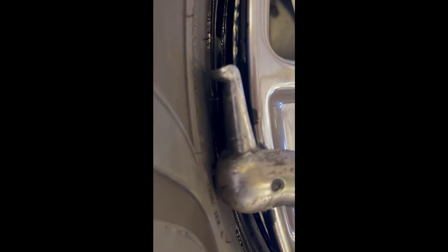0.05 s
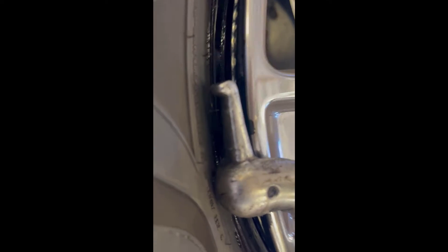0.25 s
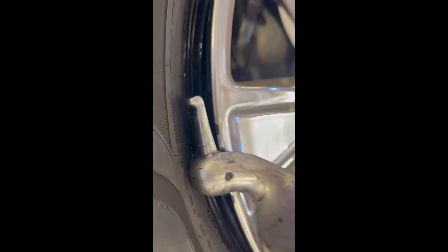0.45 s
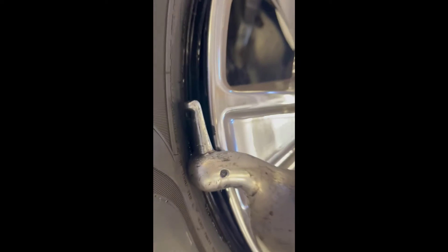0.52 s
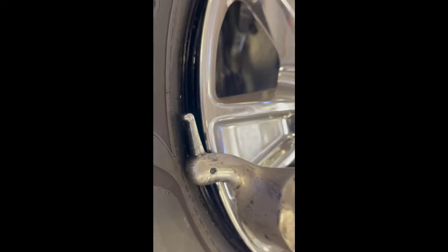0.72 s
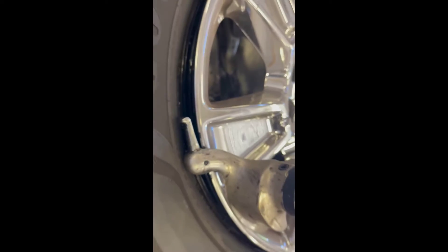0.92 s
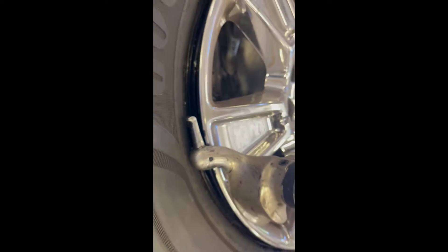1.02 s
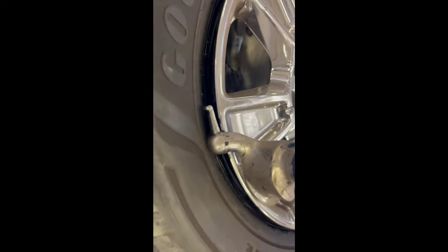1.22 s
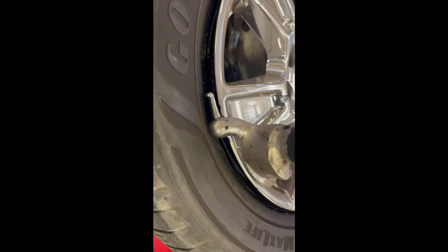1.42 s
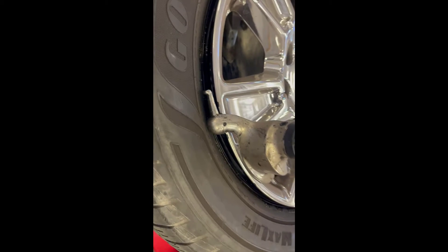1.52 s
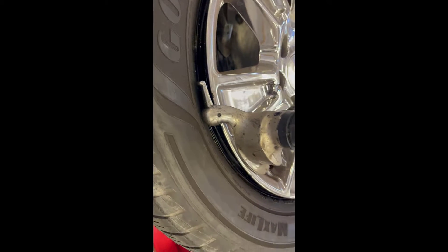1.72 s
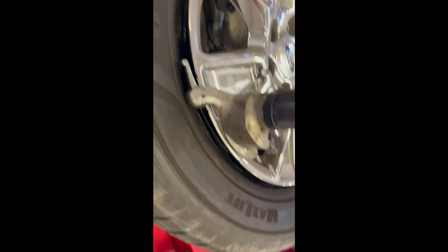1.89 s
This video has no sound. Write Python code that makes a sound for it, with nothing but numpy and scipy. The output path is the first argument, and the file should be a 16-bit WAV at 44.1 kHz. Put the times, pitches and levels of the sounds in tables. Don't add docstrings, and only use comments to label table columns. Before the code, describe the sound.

A steel mounting head clanks on a wheel rim. A faint earlier knock dies away at the start; a light metallic knock comes at 0.22 s, the loud, quickly damped clank at 0.35 s, a weak bright rebound near 0.48 s. Hard walls echo briefly. Faint ticks and a soft tyre thud follow around 1.0-1.45 s, over steady low rumble, motor hum and faint hiss until 2 s.

```python
import sys
import numpy as np
from scipy import signal
from scipy.fft import rfft, irfft, next_fast_len
from scipy.io import wavfile
from scipy.ndimage import uniform_filter1d, minimum_filter1d, map_coordinates

SR = 44100
rng = np.random.default_rng(int(sys.argv[2]) if len(sys.argv) > 2 else 0)


def makeup_ratio(level_db):
    decades = np.asarray(level_db, float) / 20
    return 10 ** decades


def to_wav(sig):
    pcm = np.clip(np.atleast_2d(sig), -1, 1) * 32767
    pcm = np.round(pcm).astype(np.int16)
    wavfile.write(sys.argv[1], SR, pcm.T)


N = 85995


def unit(x):
    return x / np.sqrt(np.mean(x ** 2) + 1e-20)


def along(points, hz):
    f, v = np.transpose(points)
    return np.interp(np.log(hz + 1), np.log(f + 1), v)


def wobble(rate):
    knots = rng.standard_normal(int(N * rate / SR) + 4)
    return map_coordinates(knots, [np.arange(N) * rate / SR])


def filtered(x, response):
    m = next_fast_len(x.shape[-1] + 8192)
    spectrum = rfft(x, m) * response(np.fft.rfftfreq(m, 1 / SR))
    return irfft(spectrum, m)[..., :x.shape[-1]]


def shaped_noise(curve, length):
    return filtered(rng.standard_normal((2, length)), lambda hz: makeup_ratio(along(curve, hz)))


def add(mix, x, s):
    k = round(s * SR)
    x = x[:, max(-k, 0):][:, :N - max(k, 0)]
    mix[:, max(k, 0):][:, :x.shape[1]] += x


# frequency in Hz, likeness from 0 to 1.
LIKENESS = [(100, .999), (300, .96), (550, .35), (2500, .4), (5000, .5), (6000, .96), (7200, .75),
            (9000, .995), (11000, .9), (12000, .995), (13400, .995), (15000, .9)]


def stereo(pair):
    def middle_and_side(hz):
        turn = np.arccos(np.clip(along(LIKENESS, hz), 0, 1)) / 2
        return np.array([np.cos(turn), np.sin(turn)])

    mid, side = filtered(pair, middle_and_side)
    return np.array([mid + side, mid - side])


# frequency in Hz, time to fall 60 dB in seconds.
NEAR_WALLS = [(100, 0.36), (350, 0.76), (1000, 0.4), (3000, 0.75), (6000, 0.59), (11000, 0.42)]
# frequency in Hz, level in dB, time to fall 60 dB in seconds.
FAR_END_OF_HALL = [(198.5, -18, 1.81), (990, -14, 0.92), (2440, -19.5, 3.44), (5200, -15.5, 2.3),
                   (10000, -13.5, 1.66)]


def workshop(pair, wet_db):
    gap_s, width = 0.005, 0.91
    hz, t, z = signal.stft(rng.standard_normal((2, N)), SR, nperseg=256)
    near = makeup_ratio(-60 * t / along(NEAR_WALLS, hz)[:, None])
    far_hz, far_db, far_t60 = np.transpose(FAR_END_OF_HALL)
    far_start_db = np.interp(hz, far_hz, far_db)[:, None]
    far = makeup_ratio(far_start_db - 60 * t / np.interp(hz, far_hz, far_t60)[:, None])
    tail = stereo(signal.istft(z * (near + far), SR, nperseg=256)[1])
    tail = np.pad(tail / np.linalg.norm(tail[0]), ((0, 0), (round(gap_s * SR), 0)))
    direct = stereo(pair * [[1], [width]])
    direct = np.pad(direct, ((0, 0), (0, tail.shape[1] - 1)))
    return makeup_ratio(wet_db) * signal.fftconvolve(pair[:1], tail, axes=1) + direct


# frequency in Hz, level in dB.
RUMBLE_COLOUR = [(12, -69), (20, -35.5), (59, 5), (76, -7), (91, -10.5), (120, -9.5), (184, -16.5),
                 (231, -14), (300, -33.5), (390, -54), (660, -120)]
# time in seconds, strength in dB.
RUMBLE_SWELL = [(0.0, -38), (0.026, -42.5), (0.254, -51), (0.422, -36), (0.76, -46.5), (1.036, -37),
                (1.134, -48.5), (1.25, -38), (1.33, -59.5), (1.374, -35.5), (1.695, -47.5), (1.732, -31.5),
                (1.77, -49), (1.95, -35.5)]


def rumble():
    low = unit(stereo(shaped_noise(RUMBLE_COLOUR, N)))
    deep = filtered(low, lambda hz: 1 / (1 + (hz / 88) ** 6))
    s, db = np.transpose(RUMBLE_SWELL)
    swell_db = np.interp(np.arange(N) / SR, s, db - db.mean())
    return makeup_ratio(-40.5) * (low - deep + makeup_ratio(0.85 * swell_db) * deep)


# frequency in Hz, level in dB.
HISS_COLOUR = [(200, -55), (280, -11.5), (500, -14), (1000, -26.5), (1700, -20.5), (2700, -35),
               (6000, -41.5), (11500, -37)]


def hiss():
    level = makeup_ratio(-55.5 + 0.7 * wobble(3))
    return level * unit(stereo(shaped_noise(HISS_COLOUR, N)))


# frequency in Hz, peak level in dB.
HUM_TONES = [(114, -77), (240, -66.5), (291, -58.5), (360.4, -55), (481, -69.5)]


def hum():
    t, total = np.arange(N) / SR, np.zeros(N)
    for hz, db in HUM_TONES:
        level = makeup_ratio(db + 1.9 * wobble(4.99))
        turns = hz * t + rng.random() + 0.15 * wobble(17)
        total += level * np.sin(2 * np.pi * turns)
    return total


TICK_STARTS = [.072, .141, .394, .449, .487, .558, .977, 1.026, 1.026, 1.103, 1.168, 1.174, 1.186, 1.225,
               1.227, 1.311, 1.321, 1.324, 1.436]
# level in dB, centre in Hz, width in Hz, time to fall 60 dB in seconds.
TICK_PUFFS = [(-34.5, 224, 180, 0.26), (-42.5, 2500, 2000, 0.032), (-13, 356, 72, 0.15),
              (-21, 290, 170, 0.035), (-27, 1910, 320, 0.1), (-40, 3800, 1600, 0.2),
              (-47, 8200, 4150, 0.016), (-47.5, 7500, 1200, 0.056), (-46, 10000, 2600, 0.053),
              (-61.5, 9400, 5300, 0.3), (-53, 1100, 2300, 0.31), (-54, 3800, 1200, 0.2),
              (-54.5, 4400, 17000, 0.33), (-40, 1270, 780, 0.022), (-48, 880, 60, 0.052),
              (-53, 3100, 3000, 0.012), (-53.5, 8100, 3300, 0.043), (-41.5, 4700, 1200, 0.022),
              (-42, 3600, 5100, 0.0088)]


def ticks():
    mix, t = np.zeros((2, N)), np.arange(SR // 5) / SR
    rise = 1 - np.exp(-t / 0.0026)
    for s, (db, centre, width, t60) in zip(TICK_STARTS, TICK_PUFFS):
        def resonance(hz):
            through = 1j * hz * width
            return (through / (centre * centre - hz * hz + through)) ** 2

        puff = unit(filtered(rng.standard_normal((2, len(t))), resonance))
        add(mix, puff * makeup_ratio(db - 60 * t / t60) * rise, s)
    return mix


# frequency in Hz, level in dB, time to fall 60 dB in seconds.
TYRE_TONES = [(146, -6, 0.12), (218, 3.5, 0.084), (255, -1.5, 0.063)]


def tyre_thud():
    mix, t = np.zeros((2, N)), np.arange(SR // 5) / SR
    thud = sum(makeup_ratio(db - 33.5 - 60 * t / t60) * np.sin(2 * np.pi * hz * t) for hz, db, t60 in TYRE_TONES)
    thud = thud * (1 - np.exp(-t / 0.0028))
    add(mix, np.array([thud, thud]), 1.229)
    return mix


def build_up(t, rise_s):
    return 1 - np.exp(-(t / rise_s) ** 2)


def steel_ring(t, tones, rise_s, low_later):
    ring = np.zeros((2, len(t)))
    for hz, db, t60 in tones:
        start = rng.random((2, 1)) * [[0], [1]] - hz * rise_s
        turns = hz * t + start + 0.13 * wobble(30.3)[:len(t)]
        decay = makeup_ratio(db - 60 * t / min(t60, 146 / hz))
        ring += build_up(t, rise_s * (1000 / hz) ** low_later) * decay * np.sin(2 * np.pi * turns)
    return ring


def blow(row, tones, crack):
    s, level_db, rise_s, crack_db, low_later = row
    t = np.arange(SR // 2) / SR
    choke = makeup_ratio(-9.5 / (1 + np.exp((0.076 - t) / 0.0031)))
    ring = steel_ring(t, tones, rise_s, low_later) * choke
    burst = unit(shaped_noise(crack, len(t))) * makeup_ratio(crack_db - 60 * t / 0.13)
    burst = burst * build_up(t, rise_s / 1.67)
    return workshop(makeup_ratio(level_db) * (ring + burst), -3.5), s


# start in seconds, level in dB, build-up in seconds, crack level in dB,
# how much later low tones build up (a power, no unit).
STEEL_BLOWS = [
    (0.2241, -20, 0.01, 0.5, 0.44),
    (0.349, -11, 0.0105, 0.5, 0.014),
    (.470, -24.5, 0.025, 1, 0.022),
]
# frequency in Hz, level in dB, time to fall 60 dB in seconds.
HEAD_TONES = [(228, -16.5, 0.31), (352.5, -0.5, 0.15), (567.3, -10.5, 0.36), (933, 4, 0.079),
              (1102.3, 0.5, .17), (3660, -4, 0.05), (1316, 2, 0.14), (1417, -5.5, 0.11), (2060, 8, 0.027),
              (2235, 5, .13), (2570, -3, .05), (3908, 0, 0.049)]
RIM_TONES = [(139, -14, 0.49), (217.2, -8, 0.25), (243.8, -7.5, 0.48), (278.6, 5, 0.11), (316, -5, 0.17),
             (352.5, 1, 0.17), (531.3, -16, 0.32), (703, -7.5, 0.2), (815, -7, 0.099), (887, 5, 0.082),
             (931, -4, 0.15), (1011.4, -1.5, 0.078), (1317, -5, .12), (1736, -2.5, .12)]
ARM_TONES = [(1186, -25, 0.041), (1817, 6.5, .16), (1890, 4, .18), (2120, 2, .1), (3940, 12, .06),
             (4160, -12, .05), (5588, -12, .06)]
# frequency in Hz, level in dB.
KNOCK_COLOUR = [(150, -10.5), (600, -10.5), (1100, 0), (1650, -7.5), (2250, -8.5), (3100, -13), (6500, -24),
                (11000, -48.5)]
CLANK_COLOUR = [(100, -12.5), (280, -9.5), (470, -10.5), (1000, -16), (2300, -18.5), (3100, -27.5),
                (4500, -20.5), (9000, -33.5)]
REBOUND_COLOUR = [(600, -35), (1850, -13), (3000, -19), (4300, -12), (7000, -18.5), (11000, -55),
                  (13000, -50)]


def steel():
    mix = np.zeros((2, N))
    earlier = (-0.073, -31, *STEEL_BLOWS[0][2:])
    knock, clank, rebound = STEEL_BLOWS
    add(mix, *blow(knock, HEAD_TONES, KNOCK_COLOUR))
    add(mix, *blow(clank, RIM_TONES, CLANK_COLOUR))
    add(mix, *blow(rebound, ARM_TONES, REBOUND_COLOUR))
    add(mix, *blow(earlier, HEAD_TONES, KNOCK_COLOUR))
    return mix


def scene():
    machines = rumble() + hiss() + hum()
    small_contacts = workshop(ticks() + tyre_thud(), -12.5)[:, :N]
    return machines + small_contacts + steel()


# frequency in Hz, level in dB.
MIC_COLOUR = [(5400, 0), (6000, 2), (6800, -3.5), (11400, -4), (12200, -8), (14000, -17), (15100, -17),
              (15500, -59)]
# frequency in Hz, phase in radians.
LEFT_LEAD = [(250, 0), (1000, .6), (2600, 1.6), (5000, 2.3), (6050, 3.14), (9000, 6.28), (11900, 9.2),
             (13400, 9.7), (14600, 12)]


def ports(dry):
    half_each = np.array([[1], [-1]]) * 0.5j
    return filtered(dry, lambda hz: makeup_ratio(along(MIC_COLOUR, hz)) * np.exp(half_each * along(LEFT_LEAD, hz)))


def limiter(x):
    ceiling, hold = 0.87, round(0.006 * SR)
    needed = ceiling / np.maximum(np.abs(x).max(axis=0), ceiling)
    return x * uniform_filter1d(minimum_filter1d(needed, size=2 * hold + 1), size=hold)


def band_limit(x):
    return signal.sosfilt(signal.butter(12, 15550, fs=SR, output="sos"), x)


def record(dry):
    mix = limiter(ports(dry))
    return band_limit(mix)


dry = scene()
out = record(dry)
to_wav(out)
```